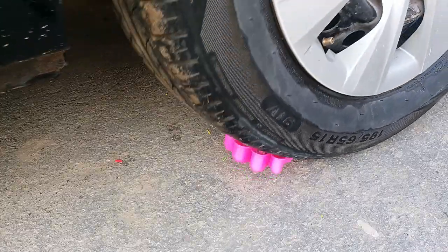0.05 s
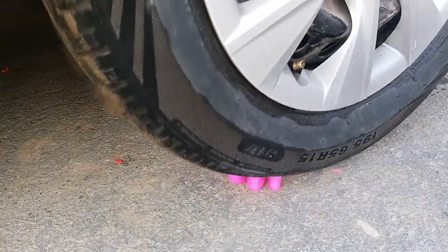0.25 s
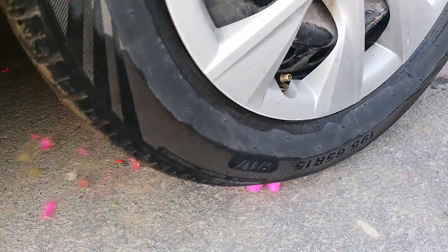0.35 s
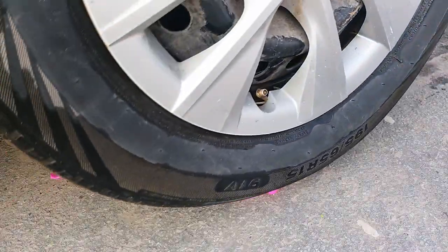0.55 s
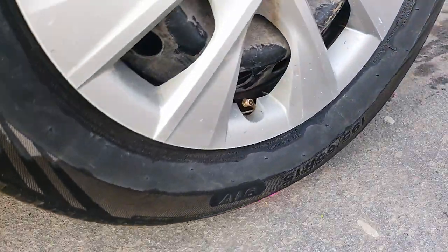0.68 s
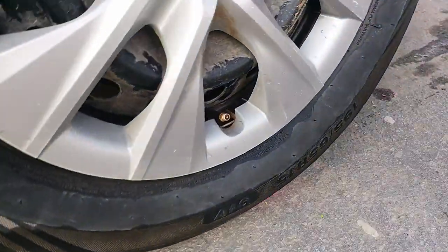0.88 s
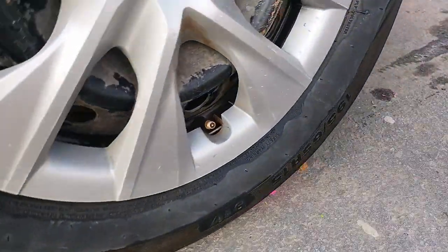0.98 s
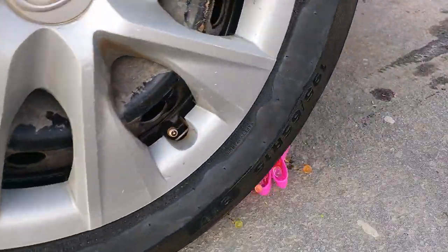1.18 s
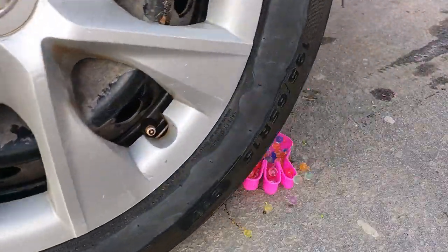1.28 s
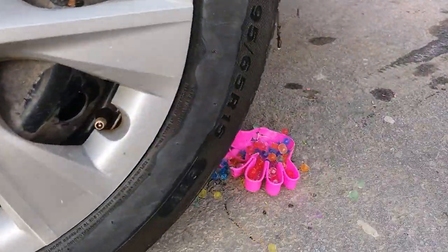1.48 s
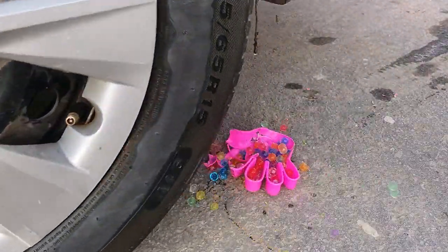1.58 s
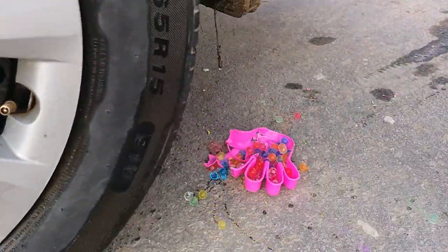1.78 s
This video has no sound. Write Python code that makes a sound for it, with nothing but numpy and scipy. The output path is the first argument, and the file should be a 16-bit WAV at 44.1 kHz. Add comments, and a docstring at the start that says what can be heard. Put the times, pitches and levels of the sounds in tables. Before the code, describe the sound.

Sharp plastic cracking, heard close outdoors, as a car tyre crushes a toy on concrete. Two dense splintering bursts come with a dull, ringing tyre thud, followed by sparser, weaker snaps while gritty rolling and engine murmur fade.

```python
"""On concrete, outdoors, close up: a car tyre rolls slowly over a brittle plastic toy.
The shell splinters in two bursts (dense click runs) and snaps piece by piece (noise cracks, damped pops).
As it gives way the tyre drops: the rubber wall thuds and the air inside rings.
Each crack scatters briefly under the car. Grit hisses under the tread; the engine murmurs."""
import sys
import numpy as np
from scipy import signal
from scipy.fft import rfft, irfft
from scipy.io import wavfile
from scipy.ndimage import uniform_filter1d

SR = 44100
rng = np.random.default_rng(int(sys.argv[2]) if len(sys.argv) > 2 else 0)


def log_audio(samples):
    """Write samples as a 16-bit WAV file to the path given in sys.argv[1]."""
    # one column per channel
    frames = np.atleast_2d(samples).T
    # limit to full scale, then quantise
    limited = np.clip(frames, -1, 1)
    pcm = np.round(limited * 32767).astype(np.int16)
    wavfile.write(sys.argv[1], SR, pcm)


N = 81585

# Single breaks: (time [s], pop level [dB], pop pitch [Hz], crack level [dB], shard pitch [Hz],
# shard resonance gain [dB], tick level [dB], burst t60 [s], scatter send [dB])
SNAPS = [(0.0724, -14.5, 1360, -21, 2130, 8, -62, 0.0069, -7),
         (0.2313, -6, 660, -8.5, 4060, 0.5, -12, 0.039, -8),
         (0.244, -14.5, 699, -12.5, 4030, 2, -19, 0.0095, 14),
         (0.275, -23, 900, -15.5, 2690, 9, -41, 0.028, -27),
         (0.2834, -30, 900, -17, 6000, -8, -17, 0.0091, -4),
         (0.3204, 4.5, 700, -23.5, 2450, 1, -31, 0.018, 0),
         (0.3718, -40, 897, -28.5, 3600, 7, -41, 0.023, 6),
         (0.4173, 4, 764, -10, 3660, 4.5, -11.5, 0.026, -1.5),
         (0.5020, -26, 649.1, -19, 4370, 7, -15, 0.018, -9.5),
         (0.5890, -23.5, 1070, -29.5, 7200, 11, -35, 0.011, -2),
         (0.6084, -1, 880, -7.5, 5840, -3.5, -9.5, 0.005, 0.5),
         (0.7511, -53, 875, -43, 4020, 6, -48.5, 0.013, 1),
         (0.7809, -53, 900, -42.5, 4000, 5, -52, 0.006, -16),
         (0.838, -67, 900, -33, 3720, 20, -34, 0.0093, -3.5),
         (0.8971, -38, 1190, -38, 4450, -12, -41, .007, -3),
         (0.928, -33, 1300, -32, 3000, -6, -41, 0.0091, 0),
         (0.9320, -21, 1450, -34, 1580, -2, -45, 0.022, -3.5),
         (1.0277, -10.5, 722, -26.5, 3610, 16.5, -32.5, 0.009, 0.5),
         (1.0290, -34, 740, -28.5, 4950, 18.5, -26, 0.02, -12),
         (1.1930, -40.5, 955, -49, 2510, -1, -58, 0.014, 9),
         (1.2308, -61, 1200, -40, 4250, 12.5, -58, 0.0075, 5.5),
         (1.2390, -58, 1200, -50, 2360, 6, -57, 0.029, 0),
         (1.5580, -60, 1200, -53, 4680, 3, -68, 0.0086, 11.5)]
# Splinter runs: (start [s], length [s], fade [dB], crack level [dB], pop level [dB], tick level [dB])
SPLINTER_RUNS = [(0.229, .011, 4.5, -17.5, -18, -31), (0.244, 0.036, 10.5, -13, -14, -22),
                 (0.281, .060, 8.5, -26, -25, -41.5), (0.419, 0.023, 3.5, -21.5, -13.5, -24.5),
                 (0.448, 0.049, 23.5, -31, -25, -45.5), (1.075, 0.061, 10, -50.5, -58, -62),
                 (1.207, 0.069, 6, -55, -82, -83)]
# Midrange crack of the plastic: (frequency [Hz], level [dB])
CRACK_SPECTRUM = [(200, -16), (600, -2.5), (1200, -6.5), (1900, 1), (3000, -3), (4300, -7), (6000, -9),
                  (8000, -21.5), (16000, -38)]
# Treble tick of the plastic: (frequency [Hz], level [dB])
TICK_SPECTRUM = [(200, -41), (3000, -25.5), (6000, 3), (8000, 4), (10800, -3), (13000, 3), (16000, 6.5)]
# Reflections under the car: (low edge [Hz], high edge [Hz], level [dB], t60 [s])
SCATTER_BANDS = [(250, 1470, -11, .10), (1270, 6400, -7.5, 0.091), (6500, 30000, -8.5, .07)]
# Tyre drops: (time [s], cavity drive [dB], wall drive [dB])
TYRE_DROPS = [(0.245, -33, -16.5), (0.2593, -5.5, -7.5), (0.4182, -34, -19.5), (0.4438, -20, -22.5)]
# Air in the tyre: (frequency [Hz], level [dB], t60 [s])
CAVITY_MODES = [(226, -2, 0.57), (237, -28, .35), (455.7, -16.5, 0.39)]
# Rubber wall: (frequency [Hz], level [dB], t60 [s])
WALL_MODES = [(61, -11.5, .3), (120, -7.5, 0.1), (157, -2, 0.085), (290, -6.5, 0.037)]
# Rolling envelope: (time [s], grit level [dB], rumble level [dB])
ROLLING_LEVELS = [(0, -34, -31), (0.14, -36.5, -33), (0.21, -38, -36), (0.245, -39, -38),
                  (0.30, -33, -26.5), (0.375, -33.5, -36.5), (0.43, -42.5, -30.5), (0.59, -46, -48.5),
                  (0.65, -51.5, -42.5), (0.88, -57, -50), (1.052, -58.5, -51), (1.3, -62, -50.5),
                  (1.55, -61, -51), (1.72, -57.5, -50.5), (1.85, -57.5, -54.5)]
# Grit under the tread: (frequency [Hz], level [dB])
GRIT_SPECTRUM = [(180, -31), (300, 1), (762, -1.5), (842, -2.5), (1170, -3), (1320, -5), (3030, -4),
                 (5080, -8), (6000, -14.5), (9390, -29.5), (15000, -23), (16000, -30)]
# Car rumble: (frequency [Hz], level [dB])
RUMBLE_SPECTRUM = [(25, -9), (48, -23.5), (72, 4), (100, -4.5), (130, 0.5), (180, -8.5), (240, -4.5),
                   (310, -24), (600, -36), (2000, -72.5)]
# Outdoor background: (frequency [Hz], level [dB])
AIR_SPECTRUM = [(180, -35.5), (300, -9), (519, -0.5), (667, 3), (787, -4), (900, -0.5), (1690, -10),
                (3640, -10), (9550, -40.5), (16000, -30.5)]
# Stereo balance: (frequency [Hz], left minus right [dB])
BALANCE = [(100, 0), (2400, 0), (3200, -1.2), (4000, -3), (5000, -3.6), (6000, -0.6), (7000, 0), (10500, 0),
           (12500, -1.2), (15000, -3)]

POP_T60_S, POP_LOW_CUT_HZ, SHARD_Q = 0.0072, 124, 6.95
RUPTURE_DB, RUPTURE_T60_S = -5, 0.00064  # onset spike of a break
SPLINTERS_PER_S, SPLINTER_POP_HZ, SPLINTER_POP_T60_S = 2400, 793, 0.0054


def plastic_toy():
    """Crushed shell: snaps and splinter runs, direct plus reflected."""
    direct, scatter_send = snaps()
    runs = splintering()
    return shell_tone(direct + runs) + underbody_scatter(shell_tone(scatter_send + runs))


def snaps():
    """Per break: damped pop, crack with shard resonance, treble tick. Returns direct and scatter send."""
    direct, scatter_send = np.zeros((2, 3, N))
    t = np.arange(SR // 20) / SR
    for time_s, pop_db, pop_hz, crack_db, shard_hz, shard_db, tick_db, t60_s, send_db in SNAPS:
        phase = 2 * np.pi * pop_hz * t
        pop = from_db(pop_db) * np.sin(phase) * decay(t, POP_T60_S) * (1 - np.exp(-phase))
        envelope = decay(t, t60_s) + from_db(RUPTURE_DB) * decay(t, RUPTURE_T60_S)
        envelope_rms = np.sqrt(np.mean(envelope ** 2))
        fracture = noise_burst(envelope, smooth_hz=900)
        shard = signal.lfilter(*signal.iirpeak(shard_hz, SHARD_Q, fs=SR), fracture)
        crack = from_db(crack_db) * envelope_rms * unit_rms(fracture + from_db(shard_db) * shard)
        tick = from_db(tick_db) * envelope_rms * unit_rms(noise_burst(envelope, smooth_hz=900))
        for row, part in enumerate((pop, crack, tick)):
            add(direct[row], time_s, part)
            add(scatter_send[row], time_s, from_db(send_db) * part)
    return direct, scatter_send


def splintering():
    """Fractures race through the shell: dense, fading click runs. Rows: pop, crack, tick."""
    pop_drive, crack, tick = np.zeros((3, N))
    clicks = [random_clicks(SPLINTERS_PER_S, spread_db=3.5) for _ in range(2)]
    for start_s, length_s, fade_db, crack_db, pop_db, tick_db in SPLINTER_RUNS:
        first, n = int(start_s * SR), int(length_s * SR)
        fade = from_db(-fade_db * np.arange(n) / n)
        breaks, knocks = (fade * unit_rms(train[first:first + n]) for train in clicks)
        add(crack, start_s, from_db(crack_db) * breaks)
        add(tick, start_s, from_db(tick_db) * breaks)
        add(pop_drive, start_s, from_db(pop_db) * knocks)
    body = ring(signal.unit_impulse(SR // 20), SPLINTER_POP_HZ, SPLINTER_POP_T60_S)
    pop = signal.fftconvolve(pop_drive, body / np.linalg.norm(body))[:N]
    return np.array([pop, crack, tick])


def shell_tone(layers):
    """Pop, crack and tick, filtered to the tone of the plastic and summed."""
    pop, crack, tick = layers
    return low_cut(pop, POP_LOW_CUT_HZ) + colour(crack, CRACK_SPECTRUM) + colour(tick, TICK_SPECTRUM)


def underbody_scatter(x, delay_s=0.0033):
    """Dense short reflections off wheel arch, underbody and ground."""
    t = np.arange(SR // 4) / SR
    response = 0
    for low_hz, high_hz, level_db, t60_s in SCATTER_BANDS:
        tail = noise_burst(decay(t, t60_s) * (t > delay_s), smooth_hz=160)
        band = signal.butter(2, [low_hz, min(high_hz, .45 * SR)], "band", fs=SR, output="sos")
        response += from_db(level_db) * signal.sosfilt(band, tail)
    return signal.fftconvolve(x, response)[:N]


def tyre_thuds(contact_s=0.0013):
    """Each drop is a soft blow that rings the enclosed air and the rubber wall."""
    cavity_drive, wall_drive = np.zeros((2, N))
    blow = np.hanning(int(contact_s * SR) + 3)
    blow /= blow.sum()
    for time_s, cavity_db, wall_db in TYRE_DROPS:
        add(cavity_drive, time_s, from_db(cavity_db) * blow)
        add(wall_drive, time_s, from_db(wall_db) * blow)
    cavity = sum(from_db(db) * ring(cavity_drive, hz, t60_s) for hz, db, t60_s in CAVITY_MODES)
    wall = sum(from_db(db) * ring(wall_drive, hz, t60_s) for hz, db, t60_s in WALL_MODES)
    return low_cut(cavity + wall, hz=87)


def rolling_car():
    """Grit clicks under the tread and low engine rumble, both easing off."""
    time_s, grit_db, rumble_db = np.transpose(ROLLING_LEVELS)
    t = np.arange(N) / SR
    grit = colour(random_clicks(per_s=9000, spread_db=2), GRIT_SPECTRUM)
    grit *= from_db(np.interp(t, time_s, grit_db))
    rumble = unit_rms(colour(rng.standard_normal(N), RUMBLE_SPECTRUM))
    rumble *= from_db(np.interp(t, time_s, rumble_db))
    return grit + rumble


def outdoor_air(level_db=-65):
    """Faint steady background noise."""
    return from_db(level_db) * colour(rng.standard_normal(N), AIR_SPECTRUM)


def noise_burst(envelope, smooth_hz):
    """Enveloped noise, evened out in time and over bands smooth_hz wide; unit energy."""
    n = len(envelope)
    x = envelope * rng.standard_normal(n)
    for _ in range(3):
        local_rms = np.sqrt(np.abs(uniform_filter1d(x ** 2, 48)) + 1e-18)
        spectrum = rfft(envelope * x / local_rms, 2 * n)
        band_power = uniform_filter1d(np.abs(spectrum) ** 2, int(2 * n * smooth_hz / SR) + 1)
        x = irfft(spectrum / np.sqrt(band_power + 1e-18))[:n]
    return x / np.linalg.norm(x)


def random_clicks(per_s, spread_db):
    """Clicks of random time, size and sign; unit RMS."""
    sizes = from_db(spread_db * np.minimum(rng.exponential(1, N), 3))
    signs = rng.choice([-1, 1], N)
    return unit_rms(sizes * signs * (rng.random(N) < per_s / SR))


def ring(x, hz, t60_s):
    """Two-pole resonator: a unit click gives a decaying unit sine."""
    radius, step_rad = decay(1 / SR, t60_s), 2 * np.pi * hz / SR
    feedback = [1, -2 * radius * np.cos(step_rad), radius ** 2]
    return signal.lfilter([0, np.sin(step_rad)], feedback, x + 1e-18)


def colour(x, spectrum):
    """Minimum-phase filter; white noise keeps its power."""
    cepstrum = irfft(np.log(unit_rms(bin_gains(spectrum))))
    cepstrum[1:N] *= 2
    cepstrum[N + 1:] = 0
    return irfft(rfft(x, 2 * N) * np.exp(rfft(cepstrum)))[:N]


def bin_gains(spectrum):
    """(frequency [Hz], level [dB]) rows to FFT bin gains."""
    hz, db = np.transpose(spectrum)
    bin_hz = np.fft.rfftfreq(2 * N, 1 / SR)
    return from_db(np.interp(np.log(bin_hz + 1), np.log(hz), db))


def low_cut(x, hz):
    """Second-order high-pass."""
    return signal.sosfilt(signal.butter(2, hz, "high", fs=SR, output="sos"), x)


def add(track, time_s, x):
    """Mix x in at time_s."""
    first = int(time_s * SR)
    track[first:first + len(x)] += x[:N - first]


def decay(t, t60_s):
    """Exponential fall, 60 dB per t60_s."""
    return from_db(-60 * t / t60_s)


def unit_rms(x):
    """Scale to RMS 1."""
    return x / np.sqrt(np.mean(x ** 2) + 1e-20)


def from_db(db):
    """Decibels to gain."""
    return 10 ** (np.asarray(db) / 20)


def scene():
    """All sources at one spot, treble slightly right."""
    mono = plastic_toy() + tyre_thuds() + rolling_car() + outdoor_air()
    left_gain = np.sqrt(bin_gains(BALANCE))
    return irfft(rfft(mono, 2 * N) * np.array([left_gain, 1 / left_gain]))[:, :N]


def record(dry, cutoff_hz=16300):
    """Soft clip at full scale, then steep low-pass."""
    rounded = dry / (1 + dry ** 4) ** (1 / 4)
    return signal.sosfilt(signal.ellip(10, .2, 80, cutoff_hz, fs=SR, output="sos"), rounded)


dry = scene()
out = record(dry)
log_audio(out)
```